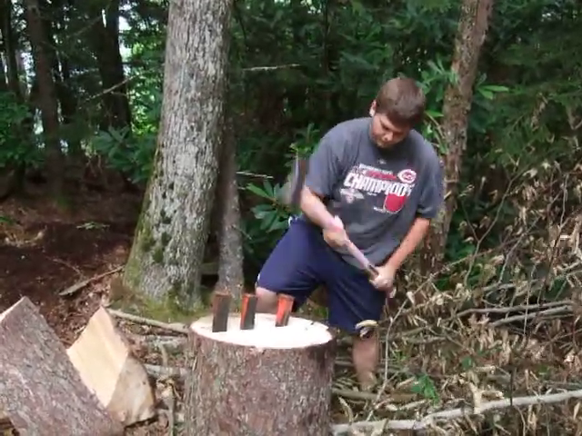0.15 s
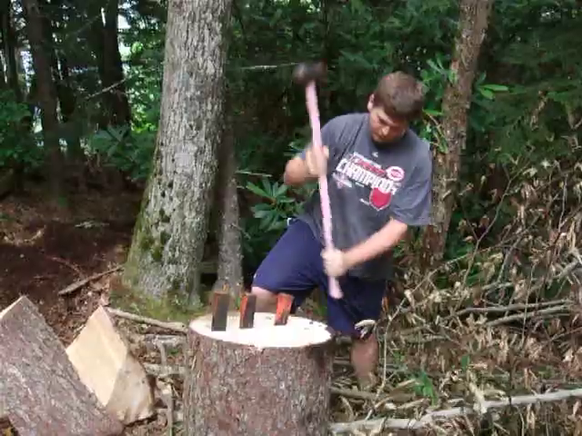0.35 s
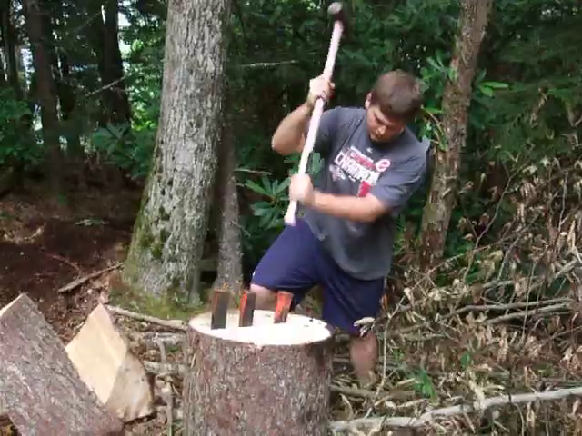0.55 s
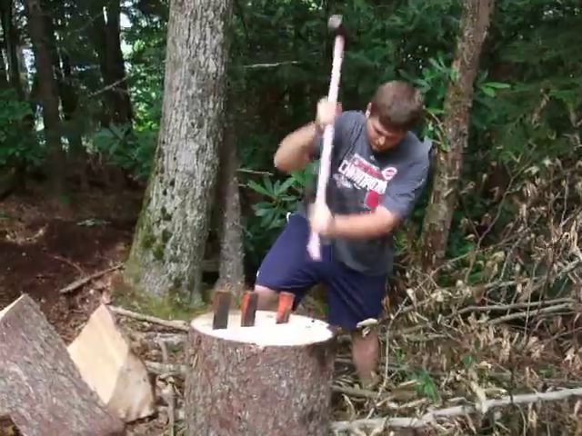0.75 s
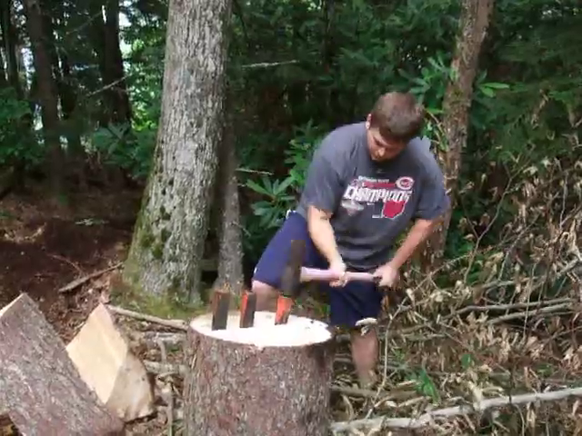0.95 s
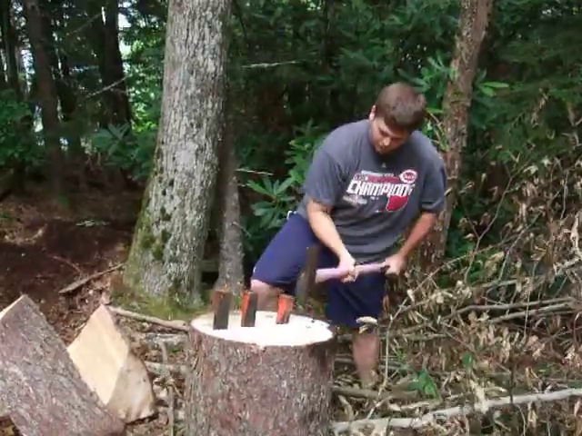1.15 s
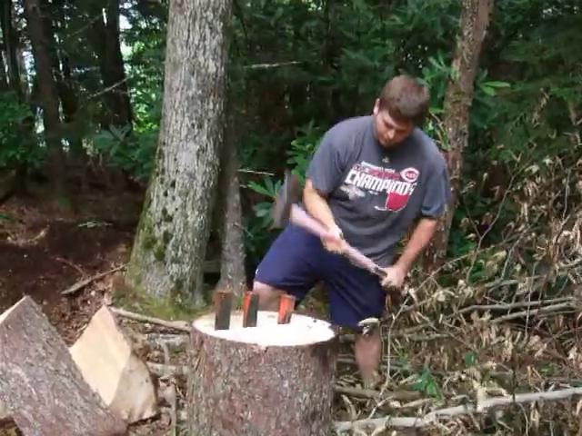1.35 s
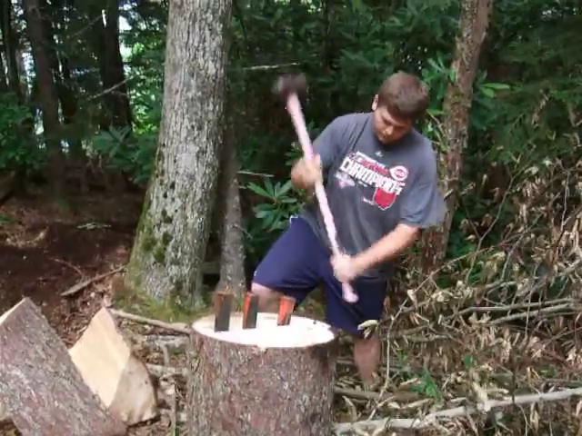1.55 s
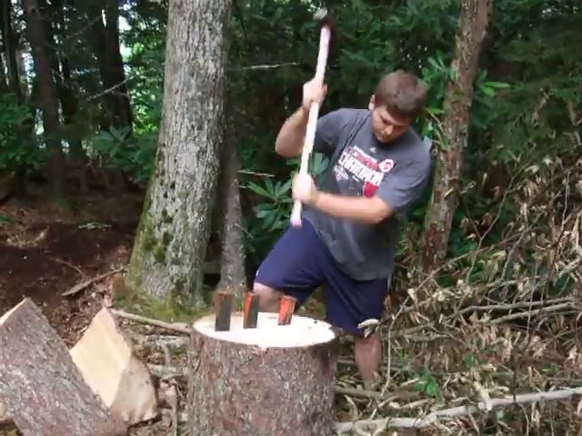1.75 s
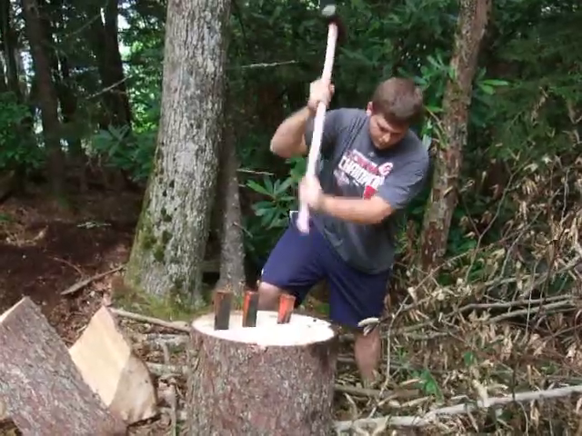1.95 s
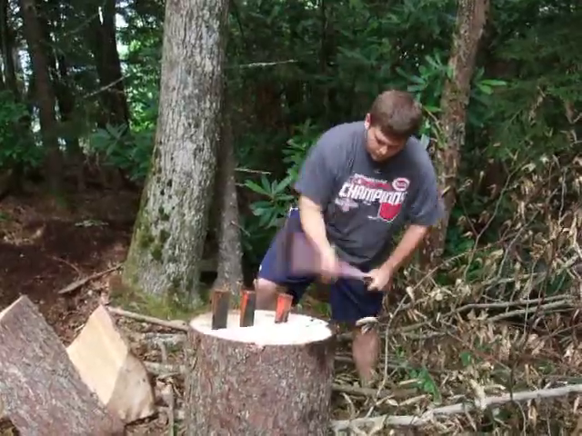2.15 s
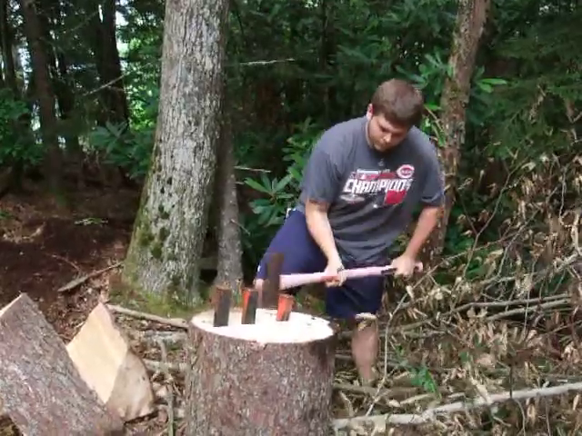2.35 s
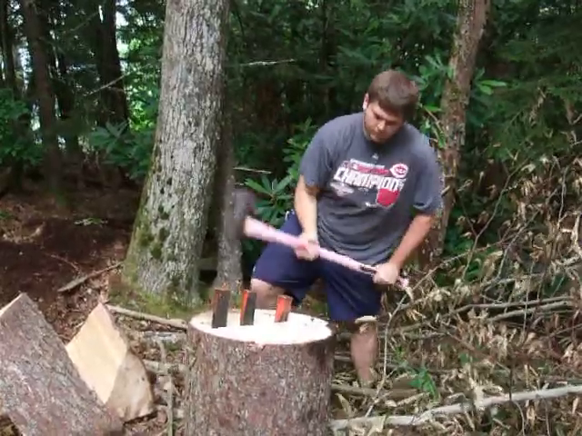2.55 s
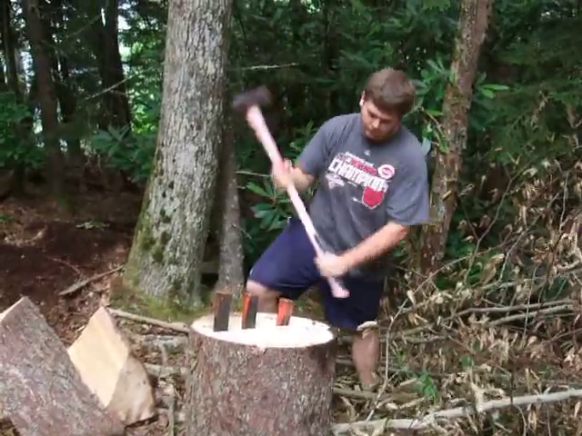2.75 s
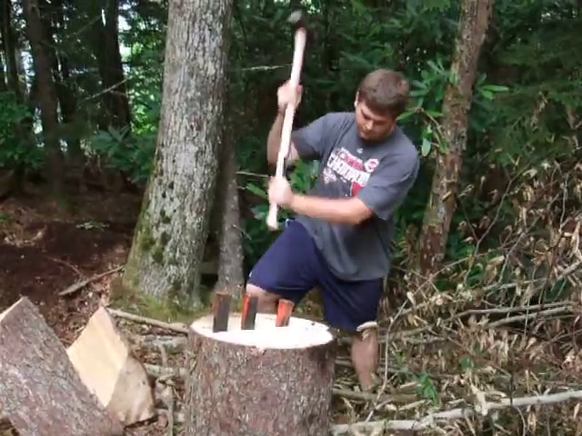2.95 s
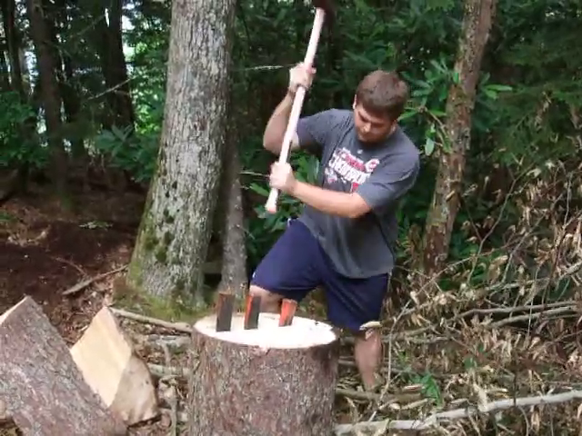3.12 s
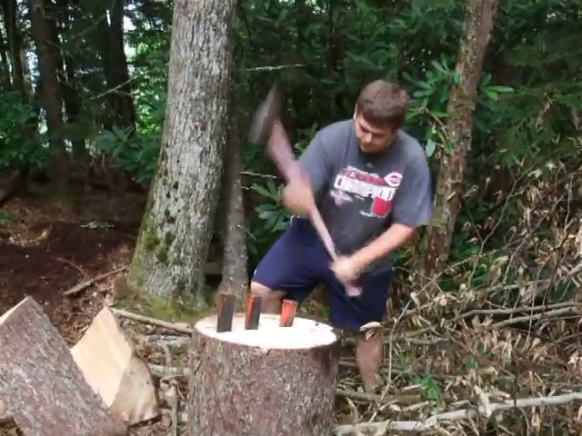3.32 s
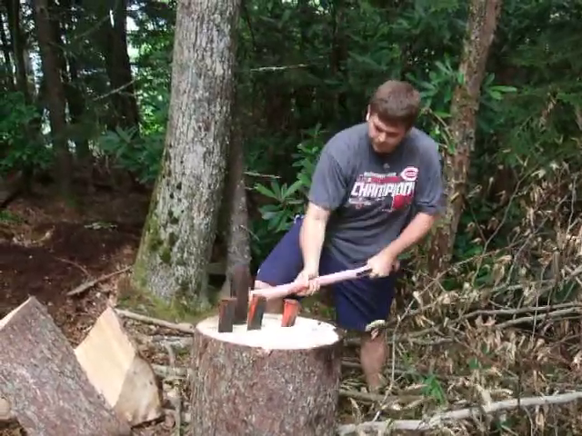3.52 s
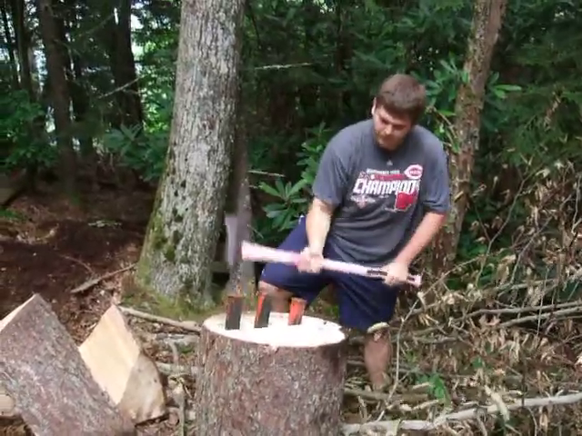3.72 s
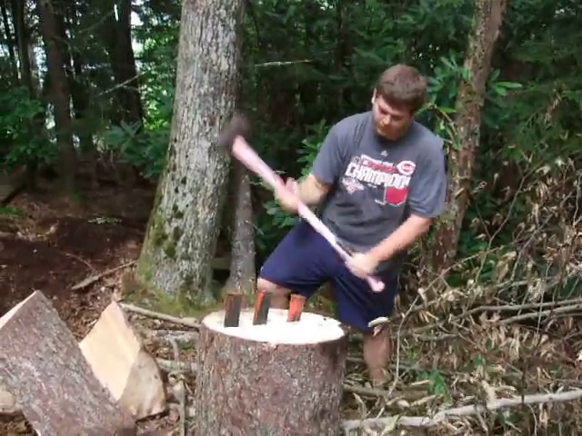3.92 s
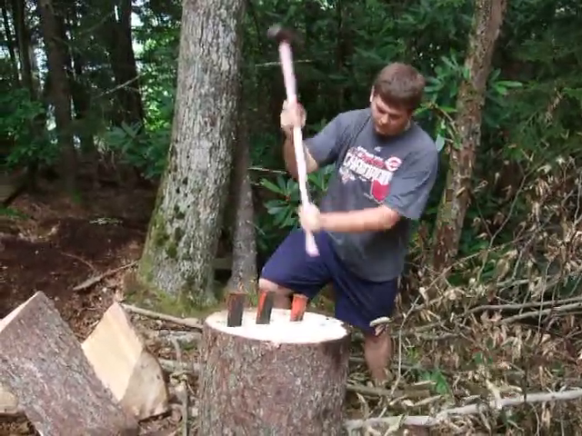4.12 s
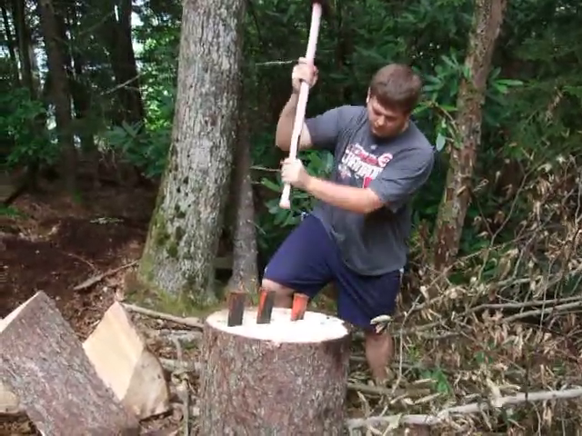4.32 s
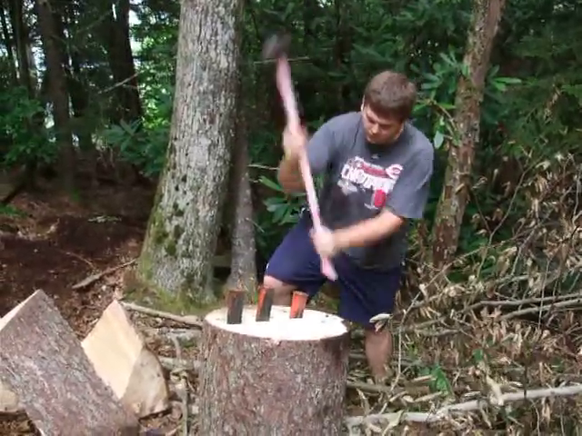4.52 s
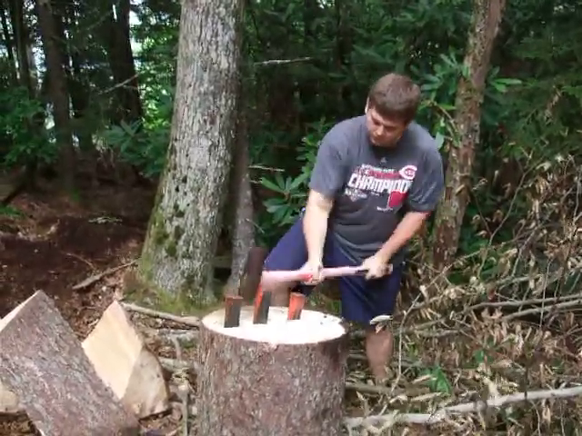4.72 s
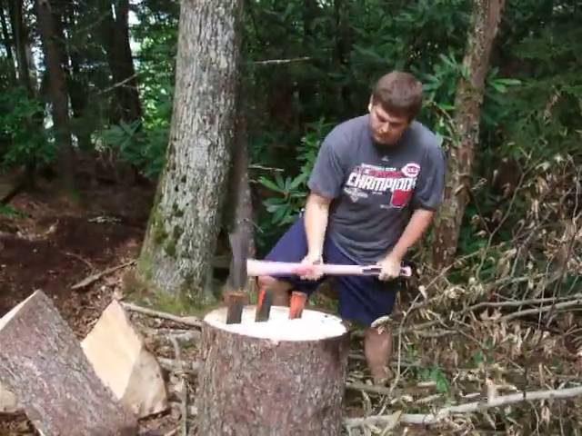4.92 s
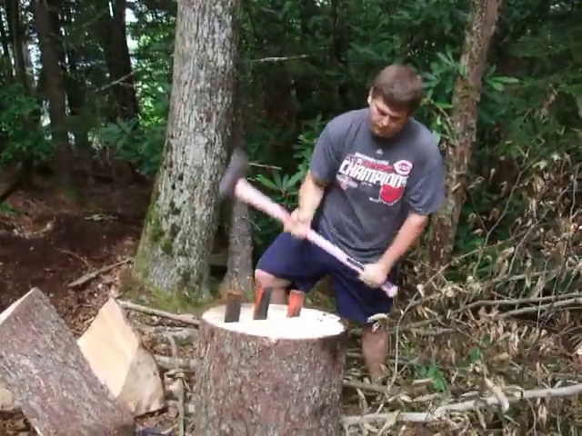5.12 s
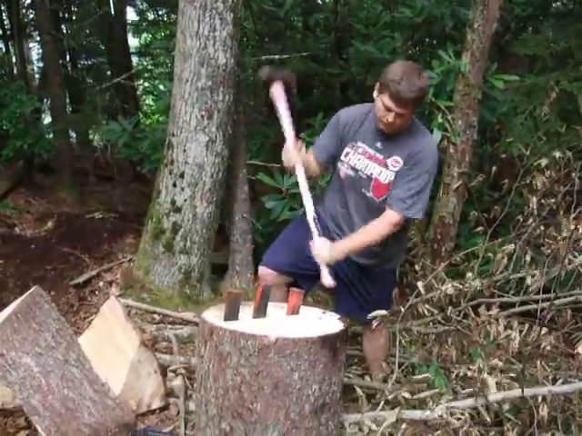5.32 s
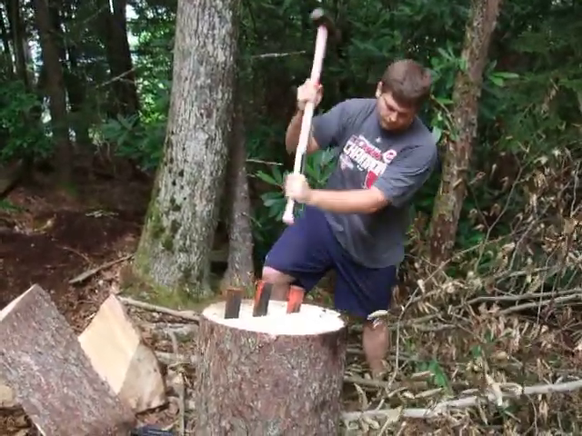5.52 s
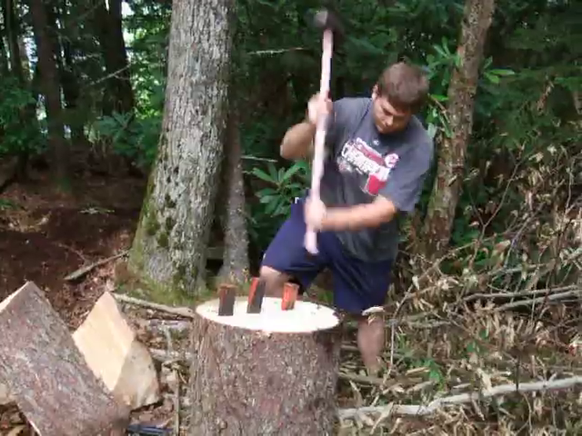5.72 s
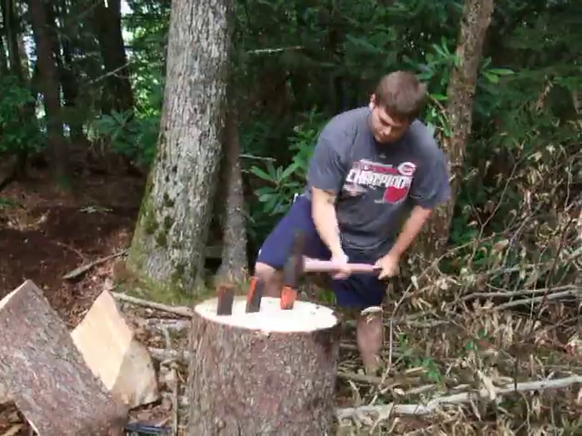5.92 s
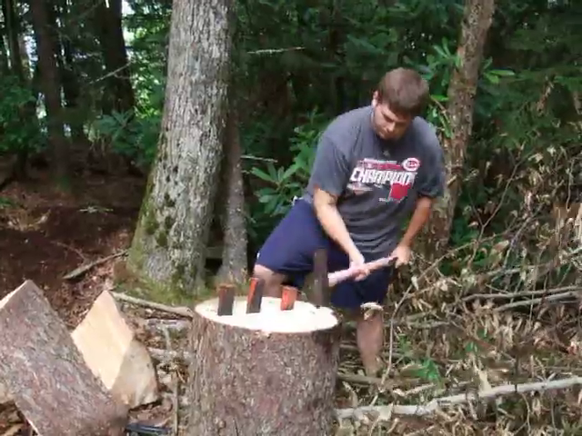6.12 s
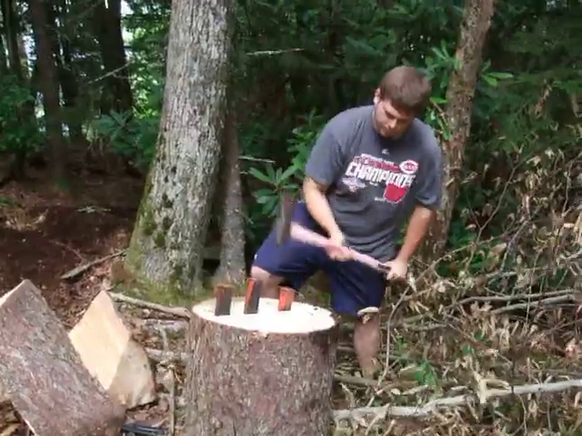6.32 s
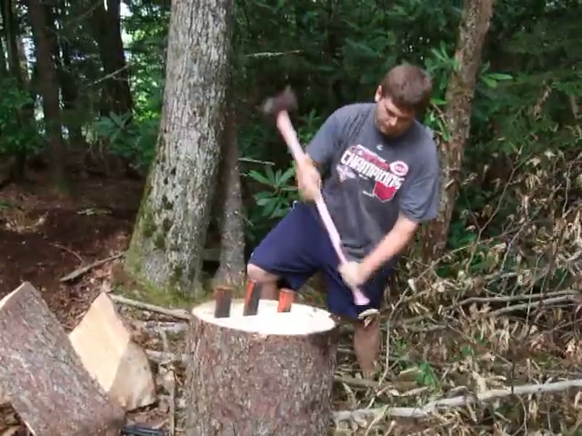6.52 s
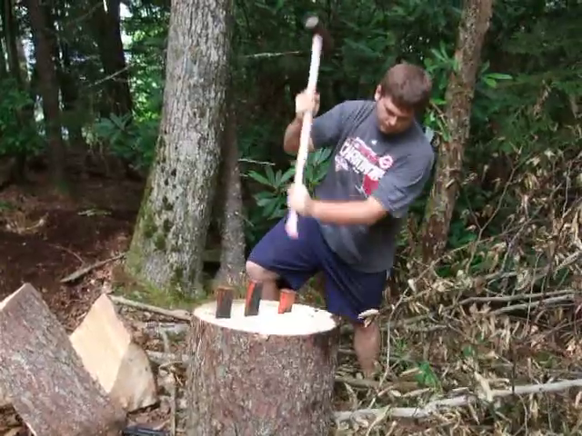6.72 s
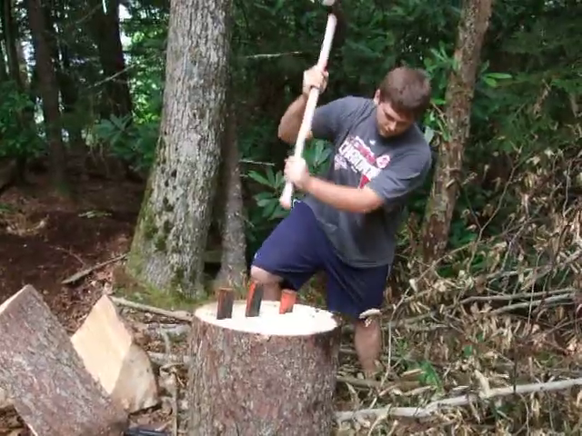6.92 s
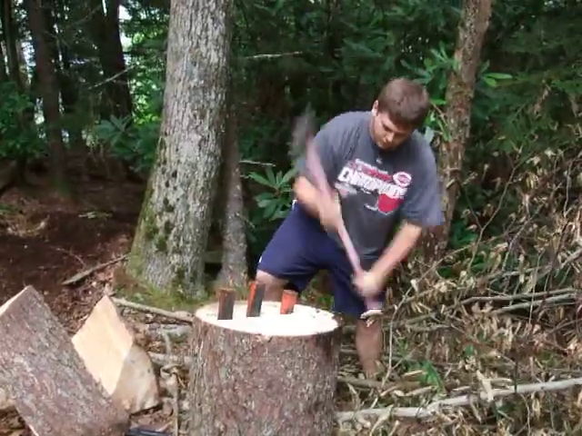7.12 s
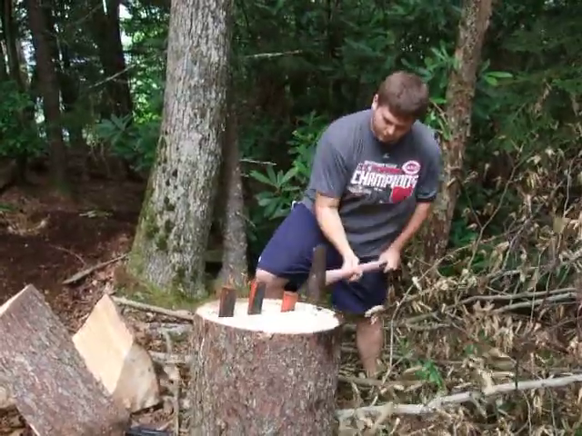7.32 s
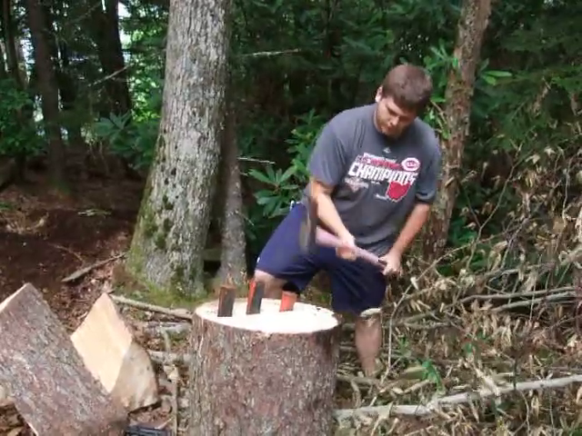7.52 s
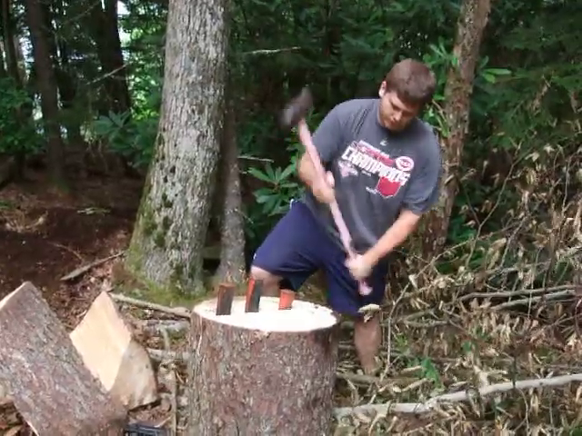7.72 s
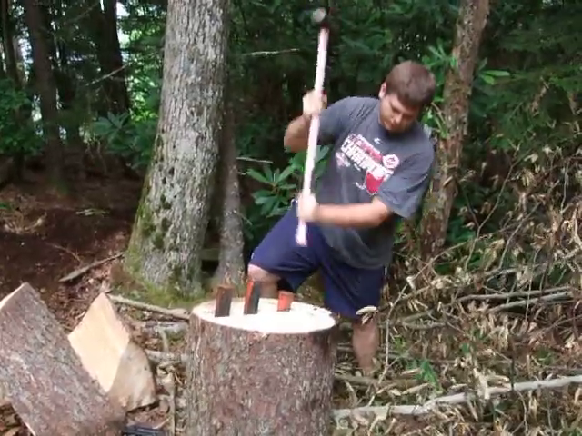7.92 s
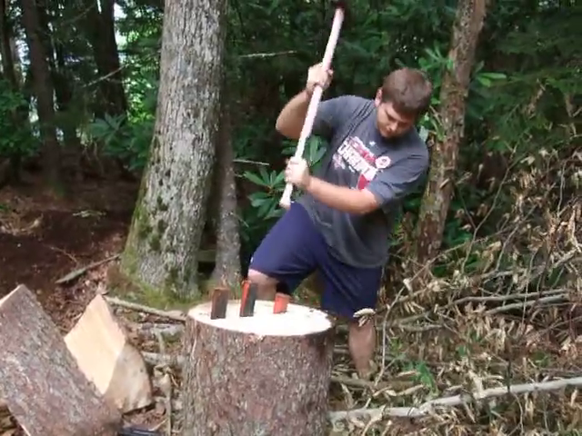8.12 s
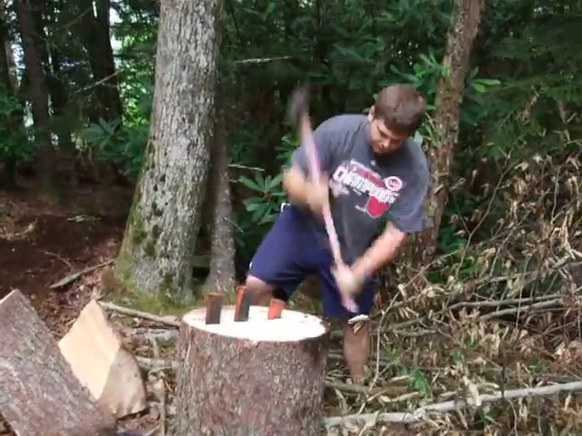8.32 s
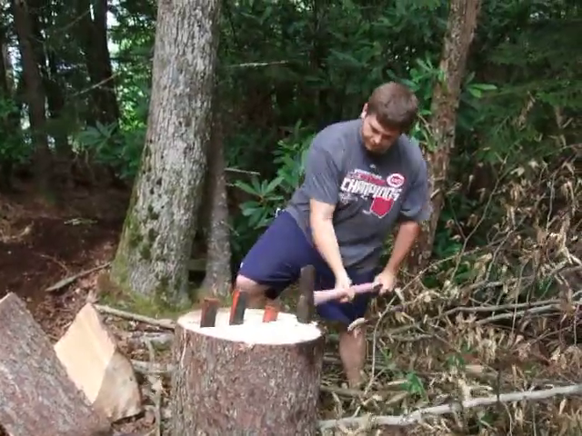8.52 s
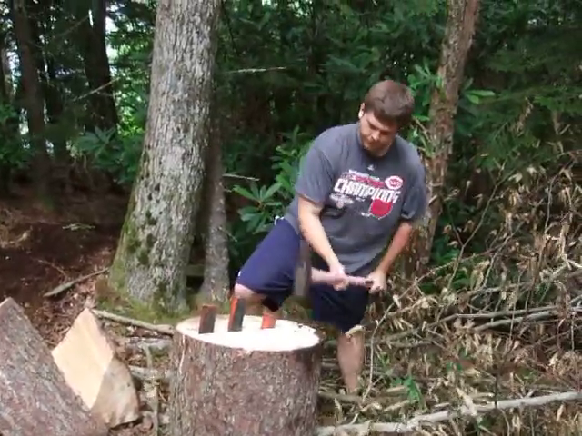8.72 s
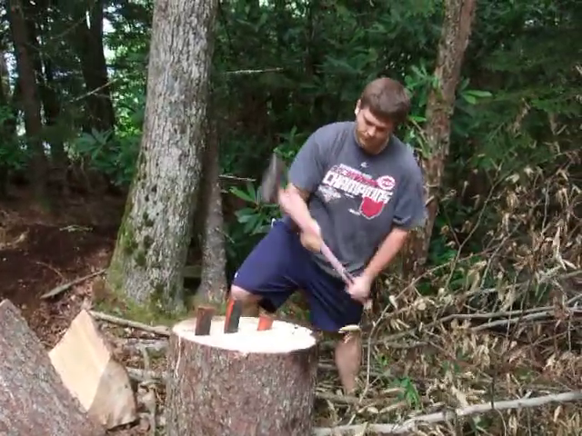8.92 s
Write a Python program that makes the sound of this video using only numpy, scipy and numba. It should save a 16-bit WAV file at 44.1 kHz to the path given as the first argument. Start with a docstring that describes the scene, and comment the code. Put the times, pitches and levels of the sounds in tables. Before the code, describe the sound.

Regular sledgehammer blows on steel wedges, about one every 1.25 seconds, over a faint even hush of forest air. The strikes are short, loud and distorted, with a clinking ring and diffuse tree echo; the third is brighter, the fourth lower and clankier. Wood fibres crackle in between, most strongly after the third blow. Mono, fairly close, with treble dulled between the clipped hits.

```python
"""Splitting a log with wedges

A sledgehammer drives steel wedges into a log at the edge of a wood, one blow about every 1.25 s.
Each blow is a dense burst of tiny impacts filtered by the modes of wedge and log, with decaying noise as
the echo from the trees. Strained wood snaps, twigs tick and the hammer head knocks, over still air.
The input stage overloads on each blow, ducks, and lets the echo swell back as its gain recovers."""
import sys
import numpy as np
from scipy import signal
from scipy.fft import rfft, irfft
from scipy.io import wavfile
from numba import njit

SR = 44100
rng = np.random.default_rng(int(sys.argv[2]) if len(sys.argv) > 2 else 0)


def master(y):
    """Save y as 16-bit WAV."""
    cut = np.clip(np.atleast_2d(y).T, -1, 1)
    pcm = np.round(cut * 32767)  # scale
    wavfile.write(sys.argv[1], SR, pcm.astype(np.int16))


N = 399546

# hammer blows: (time [s], wedge struck, strength [dB], low-mode level [dB], high-mode level [dB])
BLOWS = [(-.26, "main", 22, -3, 0.5), (0.9911, "main", 18, -5.5, 0), (2.2233, "main", 20.5, 5, -0.5),
         (3.4523, "bright", 24, -1, -14), (4.7001, "side", 15.5, -3, 6), (5.9710, "main", 18.5, 3.5, 3.5),
         (7.2434, "main", 20, 5, 0), (8.4674, "main", 19.5, 6, 3.5)]
# modes of each wedge, by wedge name: (frequency [Hz], bandwidth [Hz], relative level [dB])
WEDGE_MODES = {"main": [(2420, 79, -5.5), (2794, 140, 2.5), (5118, 130, 6.5), (5810, 18, -7.5)],
               "bright": [(4400, 120, -8), (5230, 120, 8), (5490, 100, 9), (5760, 50, 3)],
               "side": [(2580, 25, 10.5), (2950, 150, 13), (5190, 83, 7)]}
# how each wedge sits in the wood, by wedge name, as relative levels:
# (crack [dB], log thump [dB], echo [dB])
WEDGE_SEATS = {"main": (10.2, 9, 1.3), "bright": (-5.5, -8, -3.5), "side": (15.8, 9, 3.5)}
# modes of the log: (frequency [Hz], bandwidth [Hz], relative level [dB])
LOG_MODES = [(125, 60, -2), (185, 58, 2), (299, 20, 3), (598, 19, 4), (653, 62, -7), (880, 51, 3.5),
             (1123, 120, 0.5), (1810, 170, 2.5), (2332, 50, -15.5)]
# spectrum of the steel-on-steel crack with the log under it: (frequency [Hz], level [dB])
CRACK_SPECTRUM = [(40, -24), (130, -31), (220, -11.5), (400, -28), (620, -15), (1000, -7.5), (1400, -12.5),
                  (1850, -7), (3500, -5.5), (4400, -2.5), (5800, -17.5)]
# spectrum that the trees send back: (frequency [Hz], level [dB])
ECHO_SPECTRUM = [(60, -3.5), (200, -5.5), (450, 8), (900, -2), (2000, -6), (5500, -7.5)]
# spectrum of still forest air: (frequency [Hz], relative level [dB])
AIR_SPECTRUM = [(15, -41.5), (25, -0.5), (65, -5), (139, -5), (273, -5), (401, -5.5), (589, -5.5),
                (705, -5.5), (1740, -7.5), (1900, -7), (2860, -5.5), (4490, -2.5), (5500, -8),
                (7150, -66.5), (12100, -120)]
# loud snaps of strained wood:
# (time [s], level [dB], resonance [Hz], height of the resonance [dB], bass level [dB])
SNAPS = [(0.083, -20, 5230, 13, -14), (0.632, -14.5, 1870, 16, -7), (0.772, -19, 3270, 20.5, -12.5),
         (1.19, -23.5, 5170, -3, -1), (1.302, -15, 1520, 2, -5.5), (1.559, -21, 1980, 10, -2.5),
         (1.673, -17.5, 1800, 20, 9.5), (2.733, -25.5, 4520, -10, -2), (3.709, -12.5, 4400, 7.5, -2.5),
         (3.777, -8.5, 1800, 16, 15), (3.818, -5, 2000, 15, 1), (3.872, -14.5, 5050, 26, 13),
         (3.883, -8, 875, 7, 7.5), (4.444, -28, 5050, 15, 3), (6.345, -26, 3860, -6, -12),
         (7.18, -32, 2740, 9, -4), (7.712, -27, 4360, 9, -6), (7.832, -26, 4480, 21, -18),
         (7.926, -9, 4040, -17, -1.5), (8.389, -21.5, 1014, 4.5, 8.5), (8.688, -19.5, 1500, 14, 12.5)]
# spectrum that all snaps share: (frequency [Hz], level [dB])
WOOD_SPECTRUM = [(60, -38), (280, -4.5), (750, 3.5), (1800, 3), (3000, 2.5), (4300, 3.5), (5600, -3.5),
                 (9000, -53.5)]
# the hammer head drops back after its rebound:
# (time [s], level [dB], pitch [Hz], 60 dB decay time of the chatter [s])
KNOCKS = [(1.035, 2, 1030, 0.055), (3.587, -19, 233, 0.083), (4.7441, -9.5, 330, 0.064),
          (6.13, -14, 305, 0.11), (8.584, -6.5, 450, 0.081)]

# largest share by which the log's modes vary at random from blow to blow, so no two thumps sound alike
LOG_VARIATION = 0.06
BRITTLE_DB, BRITTLE_T60_S = -7.5, 0.038  # the dry crack of the contact
RING_DB, RING_T60_S = -36.5, 0.12  # the clean after-ring of the wedge
FAR_DULL_HZ = 3800  # distant echoes lose their treble above this
AIR_DB = -50  # rms level of the air ahead of the preamp
SNAP_WIDTH_HZ, SNAP_BASS_HZ = 360, 1000  # width of a snap's resonance; corner below which its bass lies
OVERTONE_RATIO, OVERTONE_DB = 2.7, -8  # second bending mode of a snapping piece
GROUND_S, GROUND_DB = 0.009, -16.5  # delay and level of a snap's first reflection
WARNING_DB, WARNING_S = -19.5, 0.061  # highest level of a warning tick re its snap; longest lead
TWIGS_PER_S, TWIG_TOP_DB, TWIG_RANGE_DB = 3, -34, 10  # rate, loudest level and range below it
TWIG_LOW_HZ, TWIG_HIGH_HZ = 1800, 5600
PREAMP_HZ, TOP_HZ = 5850, 16200  # upper band edges of preamp and converter
LIMIT = 0.5  # level the limiter holds, as a share of full scale


def undb(db):
    """Level definition: decibels to amplitude gain."""
    return 10 ** (np.asarray(db) / 20)


def unit(x):
    """Normalization: scale to an rms of 1."""
    return x / np.sqrt(np.mean(np.abs(x) ** 2))


def fade(t, t60):
    """Exponential decay: the amplitude loses 60 dB in t60 seconds."""
    return np.exp(-np.log(1000) * t / t60)


def axes(size):
    """Sampling: times [s] and frequencies [Hz], the latter raised by 1 Hz to avoid zero."""
    return np.arange(size) / SR, np.fft.rfftfreq(size, 1 / SR) + 1


def colour(f, points):
    """Spectral envelope: gain through (Hz, dB) points, interpolated over log frequency."""
    hz, db = np.transpose(points)
    return undb(np.interp(np.log(f), np.log(hz), db))


def resonance(f, hz, width):
    """Damped oscillator: gain of one mode, 1 at its centre."""
    return 1 / np.hypot(1, (f * f - hz * hz) / (f * width))


def ringing(f, modes):
    """Modal superposition: the powers of (Hz, width, dB) modes add."""
    return np.sqrt(sum((undb(db) * resonance(f, hz, width)) ** 2 for hz, width, db in modes))


def shape(x, gain):
    """Minimum-phase filtering: folding the cepstrum makes the filter with this gain causal."""
    cepstrum = irfft(np.log(gain + 1e-9))
    half = len(x) // 2
    cepstrum[1:half] *= 2
    cepstrum[half + 1:] = 0
    response = np.exp(rfft(cepstrum))
    return irfft(rfft(x) * response)


def burst(t, t60):
    """Broadband excitation: a dying spray of tiny impacts of either sign."""
    return rng.choice([-1., 1.], len(t)) * fade(t, t60)


def add(out, s, x):
    """Superposition: mix x in at time s, cutting what lies outside the scene."""
    start = int(round(s * SR))
    x, start = x[max(-start, 0):], max(start, 0)
    out[start:start + len(x)] += x[:N - start]


def forest(t, near_db, far_db, near_t60, far_t60, build_s):
    """Diffuse scattering from trunks: a strong near wash and a long, faint, duller far one."""
    near, far = rng.standard_normal((2, len(t)))
    far = signal.sosfilt(signal.butter(2, FAR_DULL_HZ, fs=SR, output="sos"), far)
    near_wash = undb(near_db) * near * fade(t, near_t60)
    far_wash = undb(far_db) * far * fade(t, far_t60)
    return (near_wash + far_wash) * (1 - np.exp(-t / build_s))


def blows():
    """Impact excitation of modes: steel cracks and rings the wedge, the log thumps, the trees answer."""
    out = np.zeros(N)
    t, f = axes(size=65536)
    for s, wedge, db, low_db, high_db in BLOWS:
        crack_db, thump_db, echo_db = WEDGE_SEATS[wedge]
        log = ringing(f * (1 + LOG_VARIATION * rng.uniform(-1, 1)), LOG_MODES)
        log = log / np.hypot(1, (110 / f) ** 2)  # the log is too small to radiate deep bass
        crack = undb(crack_db) * colour(f, CRACK_SPECTRUM) / np.hypot(1, (f / PREAMP_HZ) ** 8)

        power, ring = crack ** 2, 0
        for hz, width, mode_db in WEDGE_MODES[wedge]:
            # where the hammer lands decides how the low and high modes share the blow
            level_db = mode_db + (low_db if hz < 4000 else high_db)
            power = power + (undb(level_db + 10.5) * resonance(f, hz, width)) ** 2
            ring = ring + undb(RING_DB + level_db) * np.sin(2 * np.pi * hz * t) * fade(t, RING_T60_S)
        steel = unit(np.sqrt(power))

        contact = undb(-0.5) * burst(t, t60=0.011) + undb(-15) * burst(t, t60=0.065)
        crack_share = crack / np.sqrt(np.mean(power))
        brittle = undb(BRITTLE_DB) * shape(burst(t, BRITTLE_T60_S), crack_share)
        wash = forest(t, near_db=-33.5, far_db=-50.5, near_t60=0.87, far_t60=1.8, build_s=0.012)
        echo = shape(wash, colour(f, ECHO_SPECTRUM) * np.hypot(0.95, 0.74 * log))
        thump = undb(thump_db - 23) * shape(burst(t, t60=0.044), unit(log))
        struck = shape(contact + undb(echo_db) * echo, steel)
        add(out, s, undb(db) * (struck + ring + brittle + thump))
    return out


def air():
    """Stationary filtered noise: a faint, even hush of the still wood."""
    _, f = axes(size=N)
    gain = colour(f, AIR_SPECTRUM) / np.hypot(1, (f / 7000) ** 10)
    hush = irfft(rfft(rng.standard_normal(N)) * gain, N)
    return undb(AIR_DB) * unit(hush)


def snap(hz, ring_db, bass_db, build_s=0.002682, rise_s=0.00034):
    """Fracture: fibres give way within milliseconds and ring the wood; ground and trees send echoes."""
    t, f = axes(size=32768)
    growth = np.exp(np.minimum(t - build_s, 0) / rise_s)
    after = np.maximum(t - build_s, 0)
    overtone = undb(OVERTONE_DB) * resonance(f, OVERTONE_RATIO * hz, SNAP_WIDTH_HZ)
    modes = resonance(f, hz, SNAP_WIDTH_HZ) + overtone
    wood = colour(f, WOOD_SPECTRUM) * undb(bass_db / (1 + (f / SNAP_BASS_HZ) ** 4))
    wood = unit(wood * (1 + undb(ring_db) * modes))
    click = growth * (burst(after, t60=0.013) + undb(-15) * burst(after, t60=0.05))
    click = click + undb(GROUND_DB) * np.interp(t - GROUND_S, t, click, left=0)
    echo = forest(t, near_db=-32, far_db=-57, near_t60=0.54, far_t60=0.76, build_s=0.037)
    return shape(click + echo, wood)


def snaps(count=2):
    """Progressive fracture: strained wood warns with a few small ticks, then snaps."""
    out = np.zeros(N)
    for s, db, hz, ring_db, bass_db in SNAPS:
        sound = undb(db) * snap(hz, ring_db, bass_db)
        add(out, s, sound)
        for lead, size in rng.random((count, 2)):
            add(out, s - lead * WARNING_S, size * undb(WARNING_DB) * sound)
    return out


def twigs():
    """Random point process: thin twigs and fibres snap faintly at independent moments."""
    out = np.zeros(N)
    for when, pitch, size in rng.random((int(TWIGS_PER_S * N / SR), 3)):
        hz = TWIG_LOW_HZ + pitch * (TWIG_HIGH_HZ - TWIG_LOW_HZ)
        gain = undb(TWIG_TOP_DB + TWIG_RANGE_DB * (size - 1))
        add(out, when * N / SR, gain * snap(hz, ring_db=0, bass_db=-7.5))
    return out


def knocks():
    """Soft-contact impact: the hammer head gives the log one push, a short chatter and a faint echo."""
    out = np.zeros(N)
    t, f = axes(size=16384)
    for s, db, hz, t60 in KNOCKS:
        body = resonance(f, hz, width=0.72 * hz)
        body = body / np.hypot(1, (f / 2600) ** 2)  # soft contact dulls the treble
        body = body / np.hypot(1, (0.5 * hz / f) ** 2)  # weak bass below the pitch
        push = 4 * (t == 0) + 0.22 * burst(t, t60) + undb(-34.5) * burst(t, t60=0.53)
        add(out, s, undb(db) * shape(push, unit(body)))
    return out


def scene():
    """Linear superposition: all sources add at one microphone, given to two equal channels."""
    return np.tile(blows() + air() + snaps() + twigs() + knocks(), (2, 1))


@njit
def follow(x, attack, release):
    """Peak detection: a one-pole follower, quick up and slow down."""
    out, e = np.empty(len(x)), 0.
    for i in range(len(x)):
        e += (abs(x[i]) - e) * (attack if abs(x[i]) > e else release)
        out[i] = e
    return out


def record(dry, attack_s=0.00044, release_s=0.032, ceiling=0.63, offset=-0.0026, spill_db=-4):
    """Overload: a narrow-band preamp, a limiter too slow for sharp onsets, a converter that clips them."""
    x = signal.sosfilt(signal.ellip(8, 0.3, 80, PREAMP_HZ, fs=SR, output="sos"), dry[0])
    envelope = follow(x, 1 / (attack_s * SR), 1 / (release_s * SR))
    limited = x * LIMIT / np.maximum(envelope, LIMIT)
    x = np.clip(limited, -ceiling, ceiling)
    # only part of the clipping's splatter gets through above the preamp's band
    body = signal.sosfiltfilt(signal.butter(12, 6600, fs=SR, output="sos"), x)
    x = body + undb(spill_db) * (x - body)
    x = signal.sosfilt(signal.ellip(8, 0.2, 70, TOP_HZ, fs=SR, output="sos"), x)
    return np.tile(x + offset, (2, 1))


dry = scene()
out = record(dry)
master(out)
```